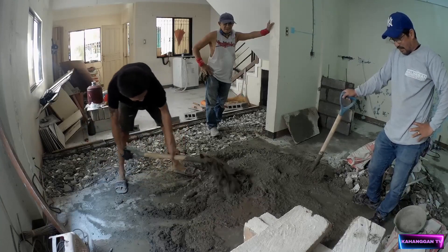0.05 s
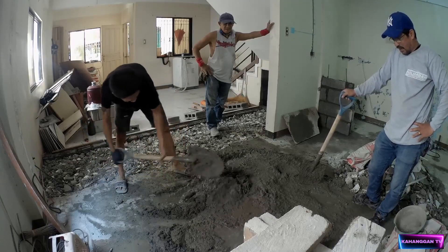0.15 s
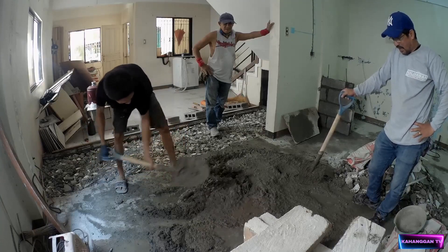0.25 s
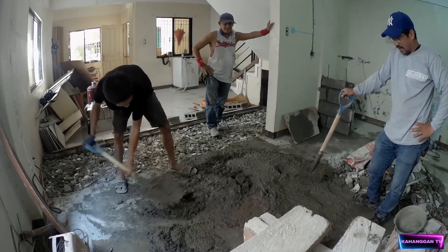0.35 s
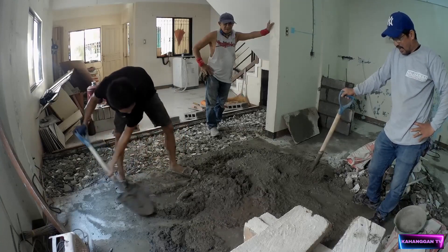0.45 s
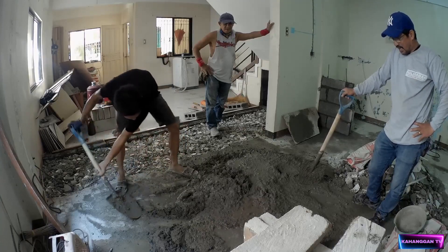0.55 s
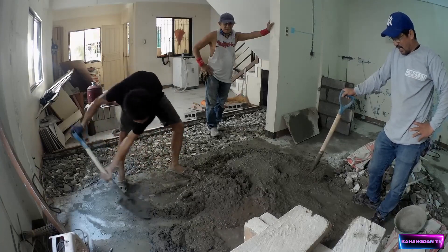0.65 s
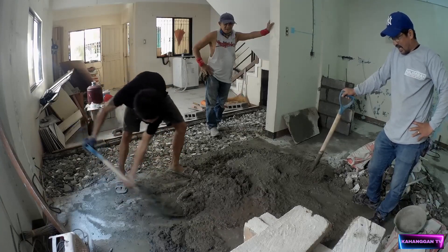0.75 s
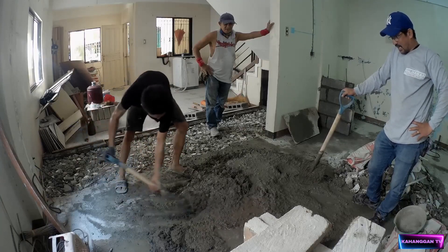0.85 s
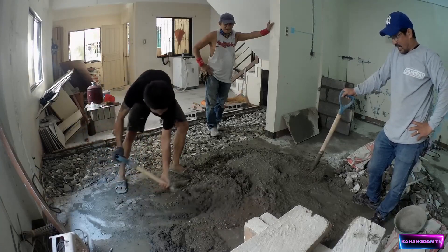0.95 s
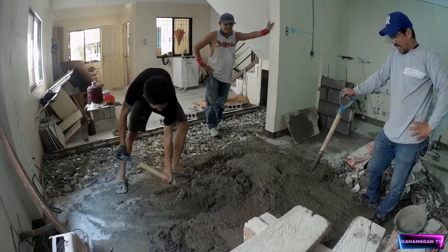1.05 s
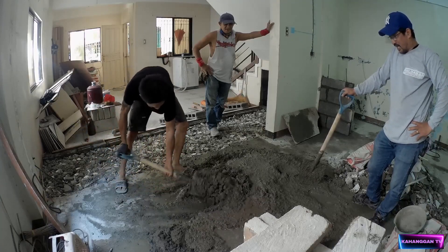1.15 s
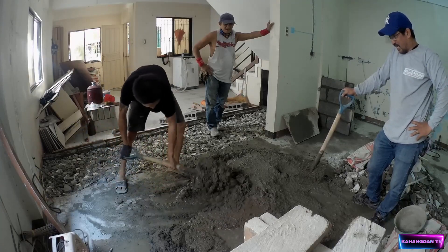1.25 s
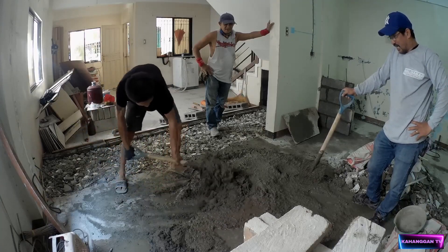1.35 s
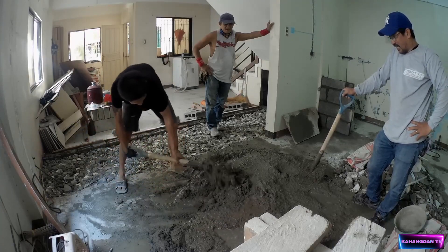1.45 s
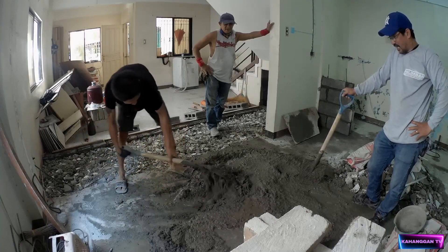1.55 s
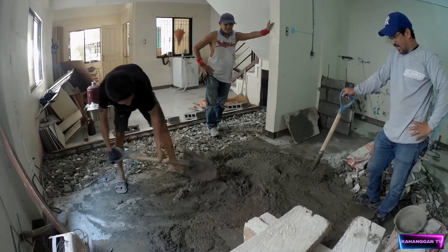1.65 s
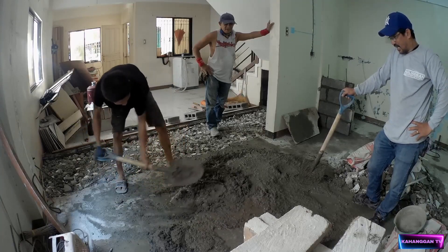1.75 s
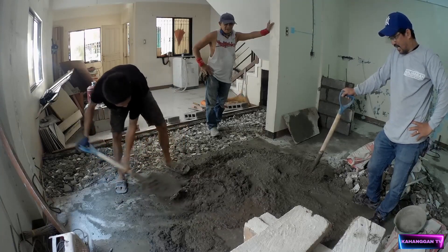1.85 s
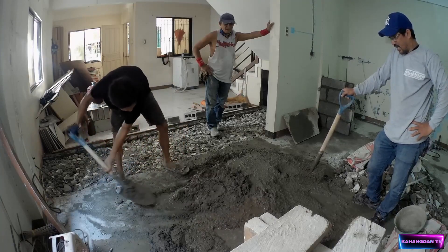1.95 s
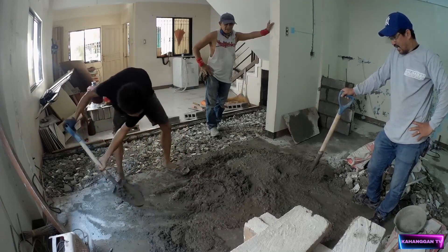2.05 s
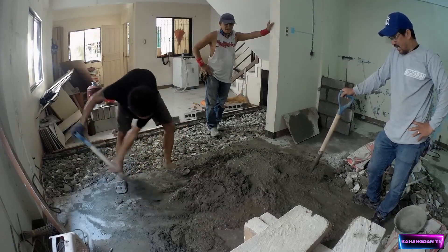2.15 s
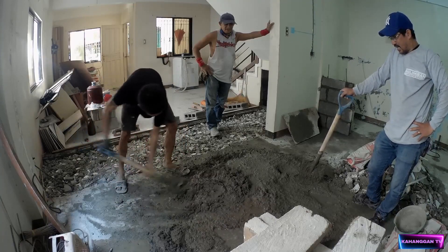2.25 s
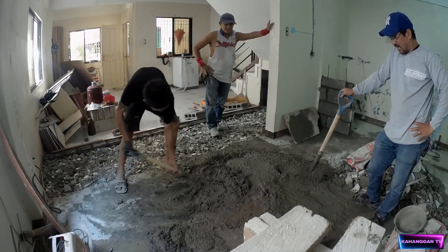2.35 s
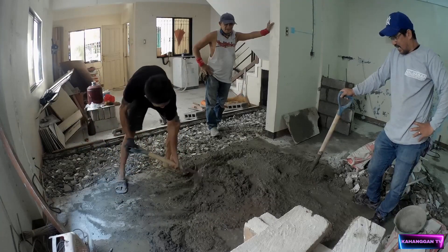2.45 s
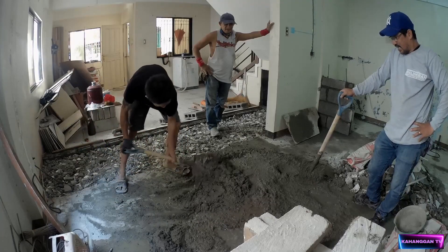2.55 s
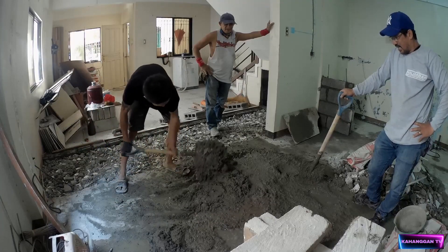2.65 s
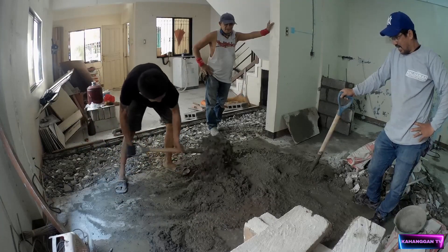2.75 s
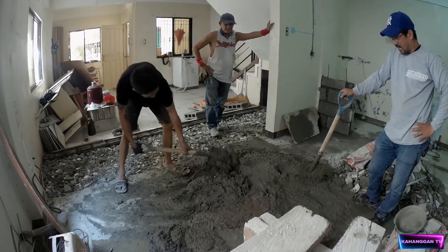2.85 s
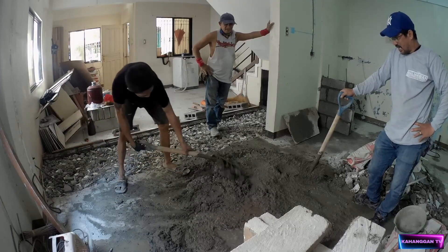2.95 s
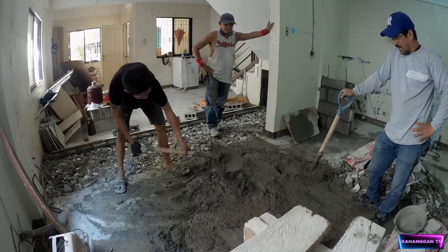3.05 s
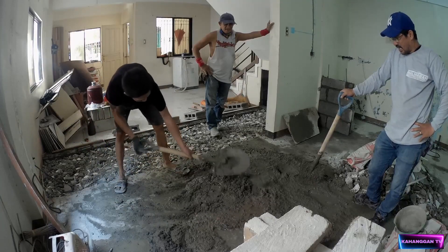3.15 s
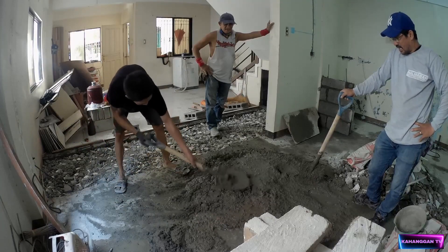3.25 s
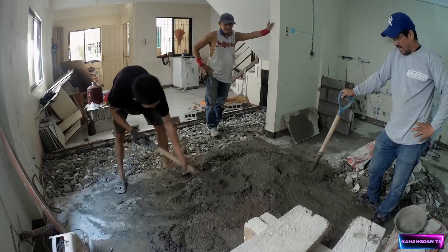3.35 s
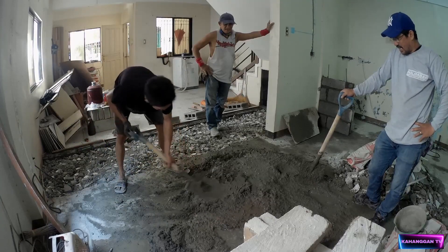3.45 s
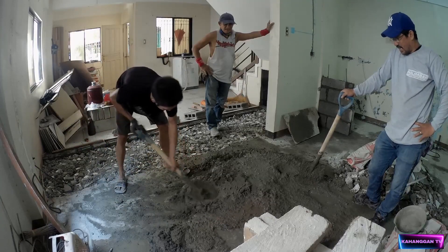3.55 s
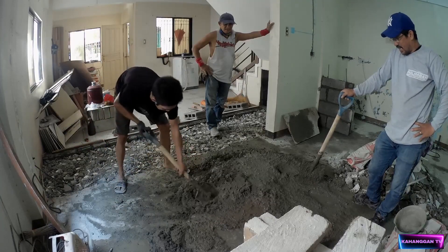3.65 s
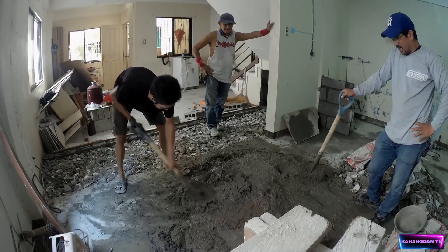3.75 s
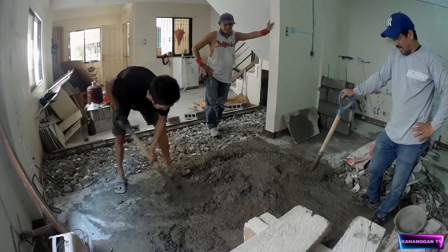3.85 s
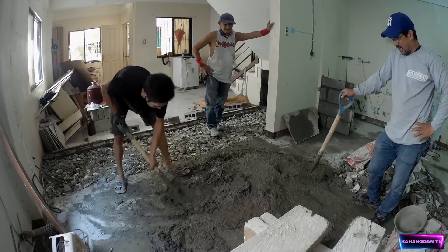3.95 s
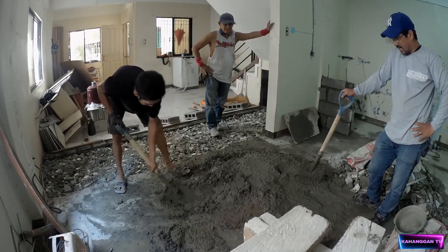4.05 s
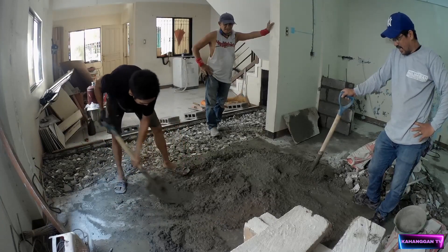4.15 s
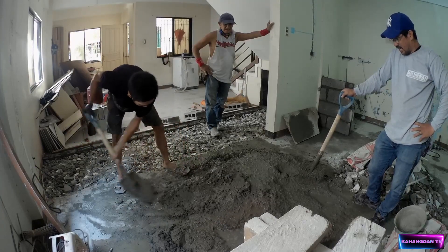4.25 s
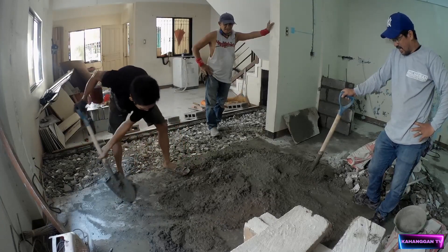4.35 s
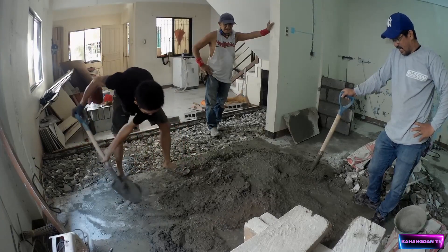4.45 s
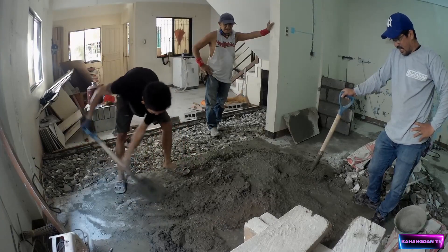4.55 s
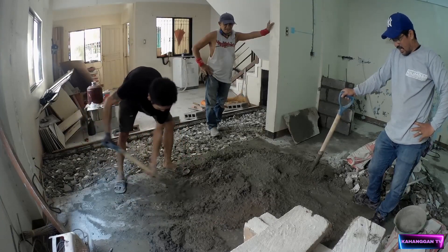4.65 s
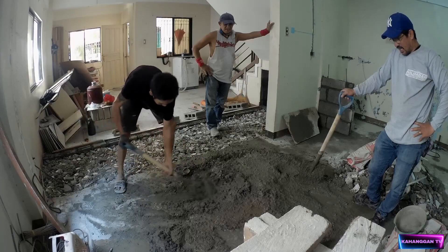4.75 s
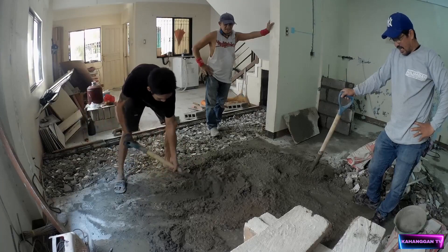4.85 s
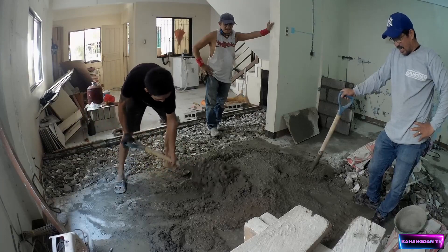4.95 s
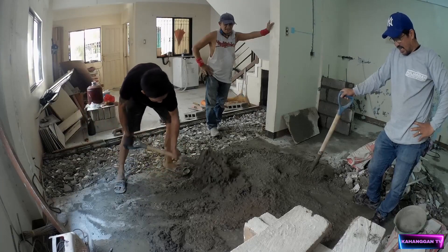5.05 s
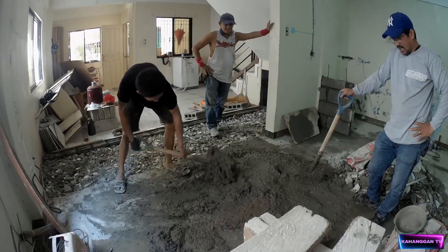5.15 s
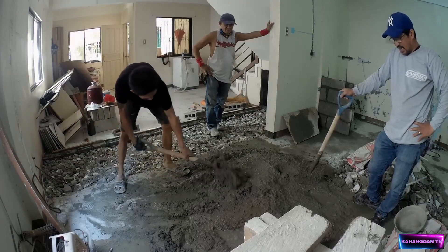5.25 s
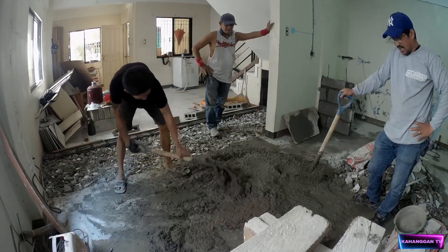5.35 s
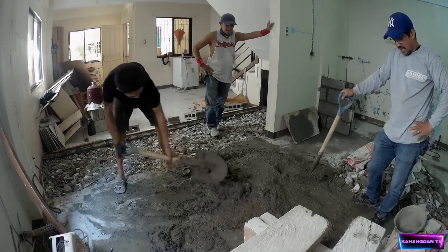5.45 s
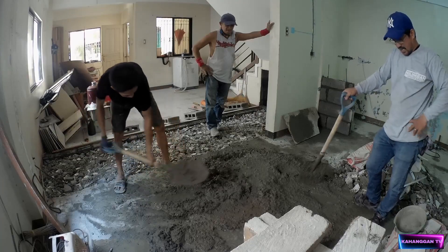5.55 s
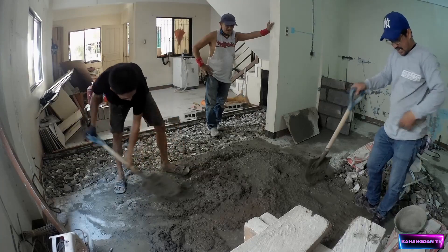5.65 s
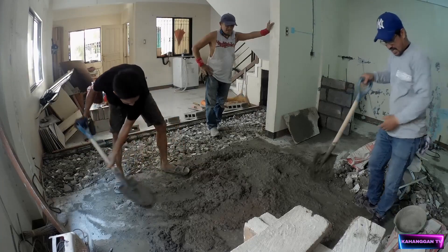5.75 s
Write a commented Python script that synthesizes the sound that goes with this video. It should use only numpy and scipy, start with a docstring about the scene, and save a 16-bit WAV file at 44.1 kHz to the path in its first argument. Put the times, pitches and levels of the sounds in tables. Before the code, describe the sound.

Mono capture near a worker mixing concrete by shovel indoors. Faint scuffs lead to a rough scoop, a short scrape, then a louder knock and gritty shove with a heavy plop. Lighter dragging follows, then a quick muffled scoop and a final hard one with a sharp steel squeal, ending in small scuffs. The hard-walled room rings on; quiet outdoor noise and a low hum lie beneath.

```python
"""A steel shovel turns a heap of wet concrete on the floor of a bare, echoing room, caught in mono.
The blade is set down with a knock and driven over the slab: gravel grinds and sand hisses as shaped random
clicks, the wet mass shifts ahead as duller clumps, and the steel rings in its modes. Short dull bursts of
resonant noise plop or thicken the scrape; the edge squeals briefly. The microphone hears all this direct and
off the walls, over faint outdoor noise and a low drone. A limiter holds down the loudest strokes."""
import sys
import numpy as np
from scipy import signal
from scipy.fft import rfft, irfft
from scipy.io import wavfile
from scipy.ndimage import uniform_filter1d, minimum_filter1d

SR = 44100
rng = np.random.default_rng(int(sys.argv[2]) if len(sys.argv) > 2 else 0)


def pcm_store(signal):
    """Save signal as 16-bit PCM."""
    levels = np.round(np.clip(np.atleast_2d(signal), -1, 1) * 32767)
    wavfile.write(sys.argv[1], SR, levels.astype(np.int16).T)


N = 255780
TIME = np.arange(N) / SR

# all levels are those of the sources, before the mix at the microphone
# spectrum of gravel under the bare blade: f/Hz, relative level/dB per Hz
GRAVEL_SPECTRUM = [(300, -34), (480, -27), (700, -4.5), (900, -2.5), (1180, 0.5), (1650, 2), (2050, -0.5),
                   (2600, -2), (3400, -13.5), (4800, -31.5), (9000, -31)]
# spectrum of sand along the blade: f/Hz, relative level/dB per Hz
SAND_SPECTRUM = [(1500, -7), (3000, 2.5), (4200, 0), (5200, -5), (6800, -0.5), (8300, -3), (10100, -12),
                 (12400, -5), (14000, -13), (15600, -37)]
# the blade is driven into the heap: start t/s, push up to the crest/s, swell over the push/dB,
# then at each layer's crest: gravel level/dB, wet mass level/dB, sand level/dB
HEAP_SCOOPS = [(0.736, 0.17, 10, -9.5, -17, -22.5), (2.224, 0.1, 9, -4.5, -13.5, -20),
               (3.609, 0.077, 14, -12.5, -22.5, -31.5), (4.564, 0.14, 12.5, -5.5, -19, -21)]


def from_db(db):
    """Decibels to gain."""
    return 10 ** (np.asarray(db) / 20)


def rms_one(x):
    """Scale to rms 1."""
    return x / np.sqrt(np.mean(x ** 2) + 1e-20)


def at_hz(points, hz):
    """Read a table on a log-frequency axis."""
    f, value = np.transpose(points)
    return np.interp(np.log(np.maximum(hz, 1)), np.log(f), value)


def coloured(x, spectrum):
    """Filter a signal by a spectrum; rms 1."""
    hz = np.fft.rfftfreq(len(x), 1 / SR)
    return rms_one(irfft(rfft(x) * from_db(at_hz(spectrum, hz)), len(x)))


def drift(rate):
    """Random wander through `rate` points a second, joined by straight lines; rms 1."""
    points = rng.standard_normal(4096)
    return rms_one(np.interp(TIME * rate, np.arange(len(points)), points))


def grains(per_s, spread_db, size=N):
    """Random clicks of either sign, mostly small and a few large; rms 1."""
    sizes = from_db(spread_db * np.minimum(rng.exponential(1, size), 4))
    struck = rng.random(size) < per_s / SR
    return rms_one(struck * sizes * rng.choice([-1, 1], size))


def resonate(x, hz, width_hz):
    """One resonance with gain 1 on top."""
    r = np.exp(-np.pi * width_hz / SR)
    feed = np.array([1, 0, -1]) * (1 - r * r) / 2
    return signal.lfilter(feed, [1, -2 * r * np.cos(2 * np.pi * hz / SR), r * r], x + 1e-18)


def burst(t60, rise):
    """A quarter second of envelope that jumps up and dies away."""
    age = TIME[:SR // 4]
    return (1 - np.exp(-age / rise)) * from_db(-60 * age / t60)


def add(out, start, sound):
    """Mix a short sound in at its time."""
    at = max(round(start * SR), 0)
    out[at:at + len(sound)] += sound[:max(N - at, 0)]


def drags():
    """Gains of gravel, wet mass and sand under light strokes over slab and heap: rise, hold, release."""
    # light strokes: start t/s, rise/s, hold/s, gravel level/dB, wet mass level/dB, sand level/dB
    strokes = [(-0.05, 0.018, 0.17, -33.5, -39, -42), (0.154, 0.018, 0.11, -44, -41, -44),
               (0.543, .01, 0.23, -45.5, -42, -69), (0.998, 0.024, 0.016, -16, -20, -37),
               (1.405, 0.018, 0.032, -31, -37, -41.5), (1.528, 0.077, 0.097, -36.5, -42, -45),
               (1.78, .03, 0.023, -38.5, -45, -52), (2.15, .01, .06, -26, -37, -42),
               (2.512, 0.043, 0.07, -27.5, -32.5, -52), (2.952, 0.015, 0.075, -35.5, -36.5, -43),
               (3.027, 0.034, 0.018, -26.5, -31, -35.5), (3.357, 0.011, 0.02, -25.5, -36, -34.5),
               (3.403, 0.055, 0.068, -24.5, -38, -33.5), (3.527, 0.067, 0.088, -45, -30, -41),
               (3.807, 0.068, 0.09, -28.5, -35, -40), (3.952, 0.061, 0.045, -26.5, -27, -38.5),
               (4.166, 0.078, 0.025, -32.5, -52, -45), (4.782, 0.045, 0.09, -23, -22, -38.5),
               (5.259, 0.025, 0.086, -34.5, -39.5, -44.5), (5.354, 0.048, 0.05, -32, -41, -41),
               (5.51, 0.022, 0.019, -37.5, -63, -43.5), (5.628, 0.033, 0.033, -41, -36, -53)]
    release_db_per_s = 183
    power = np.zeros((3, N))
    for s, rise, hold, *levels_db in strokes:
        age = TIME[:SR] + max(-s, 0)   # a stroke may already be under way
        release = from_db(-release_db_per_s * np.maximum(age - rise - hold, 0))
        shape = np.minimum(age / rise, 1) * release
        for layer, db in zip(power, levels_db):
            add(layer, s, (from_db(db) * shape) ** 2)
    return np.sqrt(power)


def crumbling():
    """Gains of gravel, wet mass and sand that keep trickling, less so while the blade is in the air."""
    # the heap between strokes: gravel level/dB, wet mass level/dB, sand level/dB
    trickle_db = (-43.5, -53, -51.5)
    # the blade swings back through the air: middle t/s, half width/s
    swings = [(0.452, 0.074), (2.0, 0.2), (4.43, 0.11)]
    swing_drop_db = 20
    in_air = sum(np.exp(-((TIME - s) / width) ** 2) for s, width in swings)
    return from_db(trickle_db)[:, None] * from_db(-swing_drop_db * in_air)


def scrape(grind_db, sand_db, depth):
    """The edge catches and slips on stones, more dully as it digs in; sand hisses in the same jerks."""
    # spectrum of gravel under the buried blade: f/Hz, relative level/dB per Hz
    buried_spectrum = [(300, -40), (480, -2.5), (700, -7), (900, -12), (1150, 0.5), (1650, -1), (2050, -5),
                       (2600, -8.5), (3400, -18), (4800, -26.5), (9000, -39)]
    jerks = drift(rate=70)
    stones = grains(per_s=1300, spread_db=2.0)
    sand = grains(per_s=5000, spread_db=2.0)
    gravel = (1 - depth) * coloured(stones, GRAVEL_SPECTRUM) + depth * coloured(stones, buried_spectrum)
    crunch = from_db(grind_db + 1.52 * jerks) * gravel
    hiss = from_db(sand_db + 0.72 * jerks) * coloured(sand, SAND_SPECTRUM)
    return crunch + hiss


def wet_mass(mass_db):
    """Stones bedded in wet mortar bump each other dully, in clumps."""
    # spectrum of the shifting mass: f/Hz, relative level/dB per Hz
    mass_spectrum = [(70, -50), (150, -20), (240, -10), (350, -4), (480, 2.5), (580, -3), (730, 3),
                     (1000, 1.5), (1400, -5.5), (3000, -56)]
    bumps = coloured(grains(per_s=900, spread_db=1.5), mass_spectrum)
    return from_db(mass_db + 2.0 * drift(rate=41)) * bumps


def blade(push):
    """The steel rings in its modes, damped by the concrete on it; white noise passes at equal power."""
    # modes of the blade: f/Hz, relative level/dB (before the division by sqrt(t60)), t60/s
    blade_modes = [(456, 8.5, 0.54), (576, 27.5, 0.66), (713, 17, 0.73), (920, -21, 0.42),
                   (1167, 21.5, 0.84), (1360, -19, 0.66), (1396, 6, 0.87), (1560, -9, 0.15),
                   (1790, 7.5, 0.24), (1840, 20, 0.77), (2265, 14, 0.8), (2500, -16, 0.34),
                   (2350, 5, 0.067), (3000, -3, 0.5), (3500, 3.5, .12), (3930, -5, 0.12)]
    age = TIME[:SR // 3]
    ring = np.zeros(len(age))
    for k, (hz, db, t60) in enumerate(blade_modes):
        decay = from_db(db - 60 * age / t60) / np.sqrt(t60)
        ring += decay * np.sin(2 * np.pi * hz * age) * (-1) ** k   # neighbours swing in opposite sense
    return signal.fftconvolve(push, ring / np.sqrt(np.sum(ring ** 2)))[:N]


def echoes(early_db, tail_db, early_t60):
    """Quick echoes from floor and near walls, then a tail whose length depends on frequency."""
    # decay of the bare room: f/Hz, t60/s
    room_decay = [(100, 2.2), (400, 1.06), (1200, 0.72), (2500, 0.84), (5000, 0.78), (8000, 0.59),
                  (13000, 0.4)]
    age = TIME[:SR * 4 // 3]
    hz = np.fft.rfftfreq(len(age), 1 / SR)
    edges = np.geomspace(60, 16000, 11)   # ten bands of tail
    early = rng.standard_normal(len(age)) * from_db(-60 * age / early_t60)
    response = from_db(early_db) * early / np.sqrt(np.sum(early ** 2))
    noise = rfft(rng.standard_normal(len(age)))
    for low, high in zip(edges, edges[1:]):
        band = (hz >= low) & (hz < high)
        fall = from_db(-60 * age / at_hz(room_decay, np.sqrt(low * high)))
        tail = irfft(noise * band, len(age)) * (1 - np.exp(-age / 0.0036)) * fall
        # each band carries energy in proportion to its width
        response += from_db(tail_db) * tail * np.sqrt(band.mean() / np.sum(tail ** 2))
    return response


def room(x, count=7):
    """As the blade travels it passes from one echo pattern to another; the standing waves stay."""
    # standing waves between the walls: f/Hz, width/Hz, level/dB
    standing_waves = [(156, 2.1, 10.5), (249.4, 9.5, 2), (338.4, 2.5, 8)]
    shares = np.array([drift(rate=30) for _ in range(count)])
    shares /= np.sqrt(np.sum(shares ** 2, axis=0))
    wet = np.zeros(N)
    for share in shares:
        pattern = echoes(early_db=-5.0, tail_db=-4.0, early_t60=0.16)
        wet += signal.fftconvolve(x * share, pattern)[:N]
    return wet + sum(from_db(db) * resonate(x, hz, width) for hz, width, db in standing_waves)


def ambience():
    """Faint outdoor noise with a low, wavering drone that swells and fades."""
    # spectrum of the outdoor noise: f/Hz, relative level/dB per Hz
    outdoor_spectrum = [(22, -14), (35, -8), (48, 3), (62, -22), (83, -16), (110, -5), (200, -11),
                        (450, -6), (900, -5.5), (1800, -8.5), (4800, -26.5), (7800, -25.5), (10000, -30.5),
                        (12500, -26.5), (15500, -32)]
    # swells of the drone: peak t/s, half width/s, level/dB
    drone_swells = [(0.75, 0.11, -49), (1.9, 0.48, -51), (4.0, .2, -51), (5.09, 0.21, -43), (5.6, .3, -56)]
    outdoor_db, drone_hz, drone_db = -45, 79.4, -57.5
    turn = 2 * np.pi * drone_hz * TIME
    drone = drift(rate=26) * np.sin(turn) + drift(rate=21) * np.cos(turn)
    swells = sum(from_db(db) * np.exp(-((TIME - s) / width) ** 2) for s, width, db in drone_swells)
    outdoors = from_db(outdoor_db) * coloured(rng.standard_normal(N), outdoor_spectrum)
    return outdoors + (from_db(drone_db) + swells) * drone


def dull_bursts():
    """Short noise bursts, each through two resonances at one pitch, plop or thicken the scrape."""
    # short dull noise bursts at one pitch: t/s, level/dB, f/Hz, t60/s
    pitched_bursts = [(0.166, -23.5, 480, 0.074), (0.634, -27, 760, 0.079), (0.841, -28, 274, 0.093),
                      (0.966, -12, 676, 0.12), (2.247, -28, 334, 0.088), (2.365, -7.5, 734, 0.11),
                      (2.405, -12, 344, 0.12), (2.602, -24.5, 337, 0.36), (3.667, -5, 440, 0.055),
                      (3.673, -25.5, 124, 0.12), (4.024, -29.5, 166, 0.34), (4.622, -27, 323, 0.18),
                      (5.281, -13, 390, 0.056), (5.643, -28.5, 760, 0.099)]
    # a short low thump at the crest of each scoop
    thump_db, thump_hz, thump_t60_s = -24, 55, 0.042
    thumps = [(s + push, thump_db, thump_hz, thump_t60_s) for s, push, *_ in HEAP_SCOOPS]
    out = np.zeros(N)
    for s, db, hz, t60 in pitched_bursts + thumps:
        fall = burst(t60, rise=0.0029)
        noise = fall * rng.standard_normal(len(fall))
        dull = resonate(resonate(noise, hz, hz), hz, 2 * hz)
        # filtering leaves the burst as strong as its envelope
        add(out, s, from_db(db) * rms_one(dull) * np.sqrt(np.mean(fall ** 2)))
    return out


def knocks():
    """The edge lands and crushes stones and grit for a moment."""
    # blade meets the floor or a stone: t/s, crunch level/dB, gritty crack level/dB
    landings = [(0.167, -27, -27), (0.623, -23, -36), (0.733, -16, -24.5), (1.406, -29, -35),
                (1.667, -43, -26), (2.143, -17, -19.5), (3.357, -20.5, -28), (4.485, -26, -46),
                (4.564, -17, -27), (5.277, -20.5, -44), (5.517, -19, -39)]
    out, fall = np.zeros(N), burst(t60=.07, rise=.004)
    for s, crunch_db, crack_db in landings:
        crush = rng.standard_normal(len(fall))
        crunch = from_db(crunch_db) * coloured(crush, GRAVEL_SPECTRUM)
        crack = from_db(crack_db) * coloured(crush, SAND_SPECTRUM)
        add(out, s, fall * (crunch + crack))
    return out


def squeals():
    """The steel edge skids: stick and slip locks onto one pitch for a few cycles, unsteadily."""
    # skids of the edge: peak t/s, level/dB, f/Hz, half width/s
    skids = [(0.629, -26, 1756, 0.0048), (2.147, -23, 1154, 0.0064), (2.15, -22, 3440, 0.0063),
             (2.159, -18.5, 1650, 0.0042), (2.243, -26, 7560, 0.0028), (4.496, -30.5, 2390, 0.0061),
             (4.571, -14.5, 2390, 0.0064), (4.651, -9, 1690, 0.016), (5.46, -26, 1160, 0.016)]
    out, from_peak = np.zeros(N), TIME[:SR // 10] - 1 / 20
    for s, db, hz, width in skids:
        waver = rms_one(uniform_filter1d(rng.standard_normal(len(from_peak)), size=60))
        tone = np.sqrt(2) * np.sin(2 * np.pi * hz * np.cumsum(1 + 0.036 * waver) / SR)
        add(out, s + from_peak[0], from_db(db) * np.exp(-(from_peak / width) ** 2) * tone)
    return out


def swell(start, push, swell_db, surge, stall_db_per_s):
    """Gain of a hard push: it bites, grows to about 1 at the crest and stalls."""
    attack_s = .009
    age = np.maximum(TIME - start, 0)
    # surge 1 = even growth in dB; higher = a late surge
    growth_db = swell_db * (np.minimum(age / push, 1) ** surge - 1)
    stall_db = stall_db_per_s * np.maximum(age - push, 0)
    return (1 - np.exp(-age / attack_s)) * from_db(growth_db - stall_db)


def scoops():
    """Gains of gravel, wet mass and sand in hard pushes; past the crest each dies at its own pace."""
    # the wet mass gathers ahead of the blade and peaks later
    mass_lag_s, mass_swell_db = 0.057, 22
    gains = np.zeros((3, N))
    for s, push, swell_db, gravel_db, mass_db, sand_db in HEAP_SCOOPS:
        gravel = swell(s, push, swell_db, surge=1.96, stall_db_per_s=177)
        mass = swell(s, push + mass_lag_s, mass_swell_db, surge=0.59, stall_db_per_s=78)
        sand = swell(s, push, swell_db, surge=0.9, stall_db_per_s=217)
        gains += [from_db(gravel_db) * gravel, from_db(mass_db) * mass, from_db(sand_db) * sand]
    return gains


def blade_depth():
    """0 bare .. 1 buried: the blade sinks in around the crest of each scoop and is lifted out again."""
    skim_depth = 0.15   # while the blade skims the slab
    bury_lead_s, bury_s, lift_after_s, lift_s = 0.054, 0.12, 0.2, 0.22
    buried = np.zeros(N)
    for s, push, *_ in HEAP_SCOOPS:
        from_crest = TIME - s - push
        sinking = np.clip((from_crest + bury_lead_s) / bury_s, 0, 1)
        lifting = np.clip(1 - (from_crest - lift_after_s) / lift_s, 0, 1)
        buried += sinking * lifting
    return np.clip(skim_depth + (1 - skim_depth) * buried, 0, 1)


def scene():
    """Scrapes, knocks and shifting mass ring the blade; the microphone hears it direct and off the walls."""
    power = scoops() ** 2 + drags() ** 2 + crumbling() ** 2
    grind_db, mass_db, sand_db = 10 * np.log10(power)
    contact = scrape(grind_db, sand_db, blade_depth()) + knocks() + wet_mass(mass_db)
    shovel = contact + from_db(-24.5) * blade(contact) + dull_bursts()
    skids = squeals()
    direct = from_db(-5.5) * (shovel + skids)
    # the flat blade beams its squeals, so less of them reaches the walls
    reflected = room(shovel + from_db(-4.5) * skids)
    return (direct + reflected + ambience())[None]


def record(dry):
    """A fast limiter holds the peaks down; the top is cut."""
    ceiling, cutoff_hz = .7, 15750
    hold = np.ones(64) / 64   # samples over which the gain is smoothed
    needed = np.minimum(1, ceiling / (np.abs(dry[0]) + 1e-9))
    gain = minimum_filter1d(needed, size=len(hold))
    limited = dry * np.convolve(gain, hold, "same")
    return signal.sosfilt(signal.ellip(12, .2, 90, cutoff_hz, fs=SR, output="sos"), limited)


dry = scene()
out = record(dry)
pcm_store(out)
```